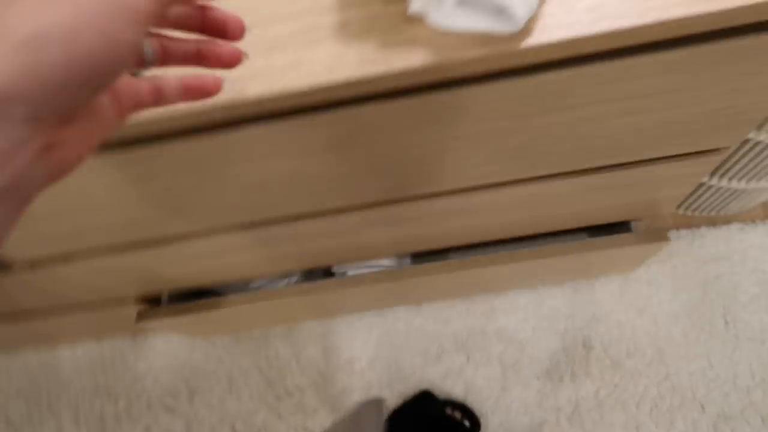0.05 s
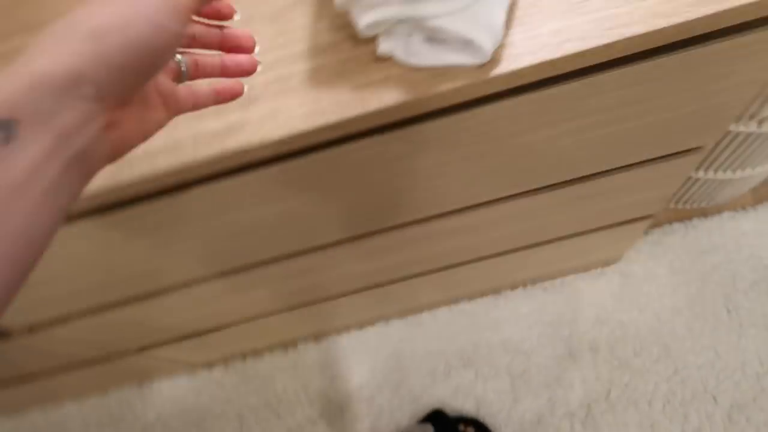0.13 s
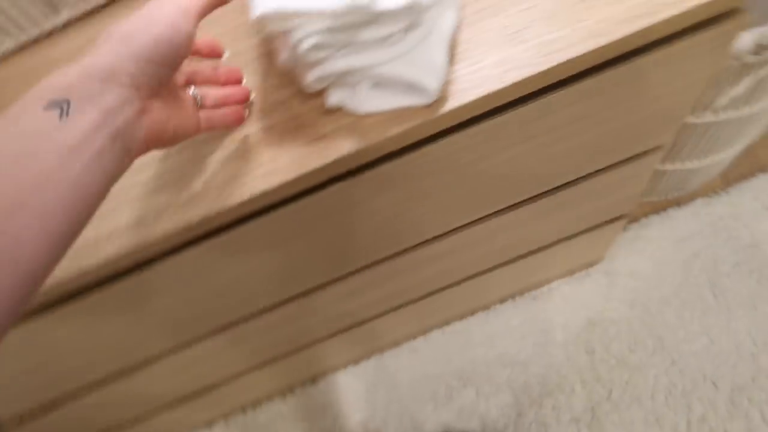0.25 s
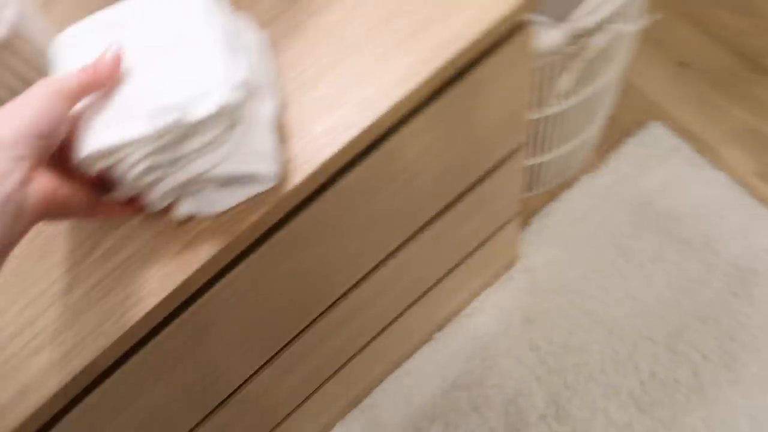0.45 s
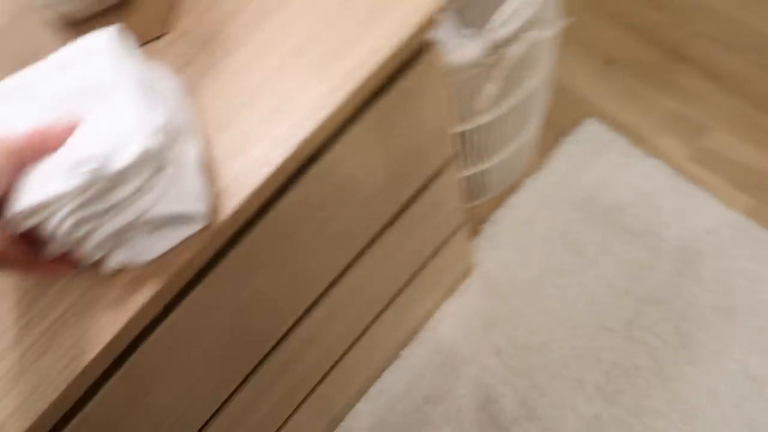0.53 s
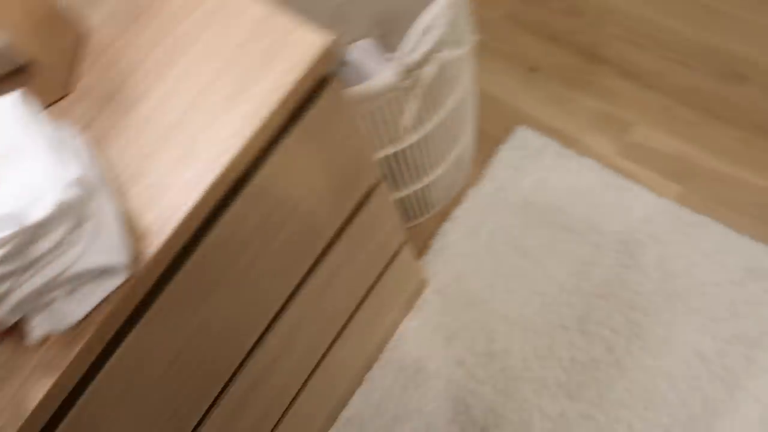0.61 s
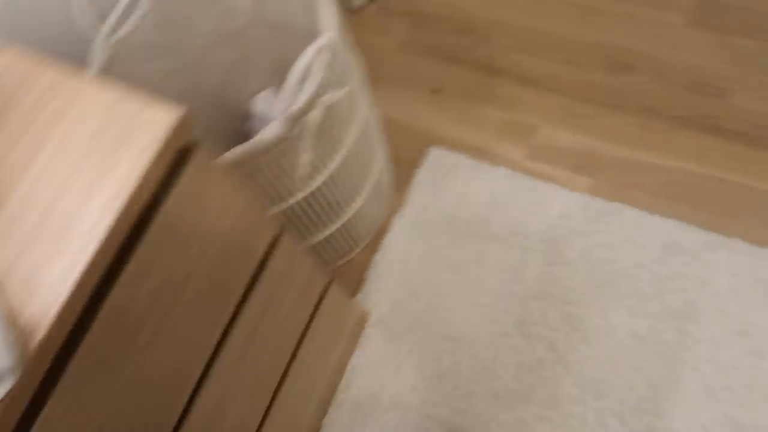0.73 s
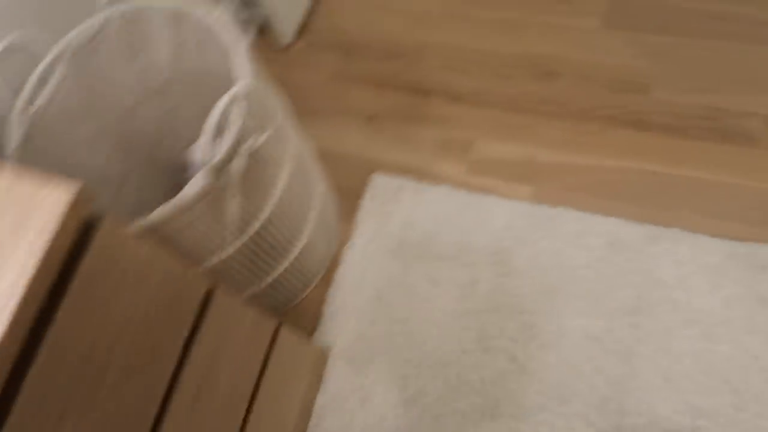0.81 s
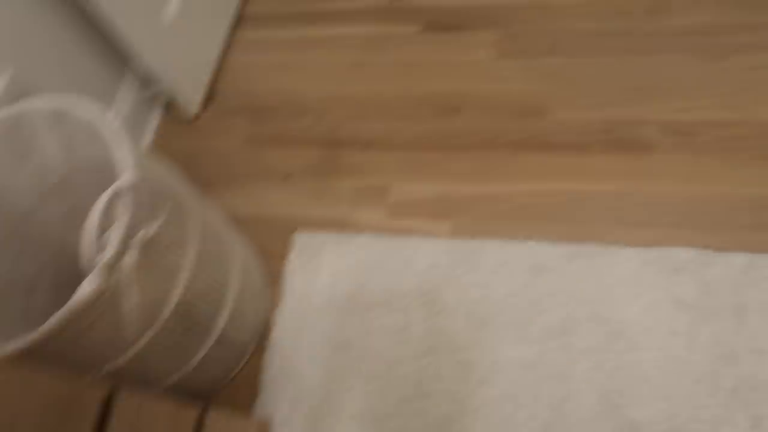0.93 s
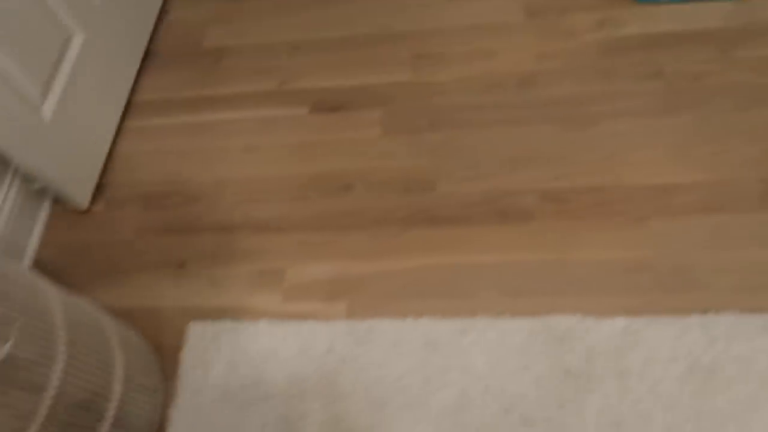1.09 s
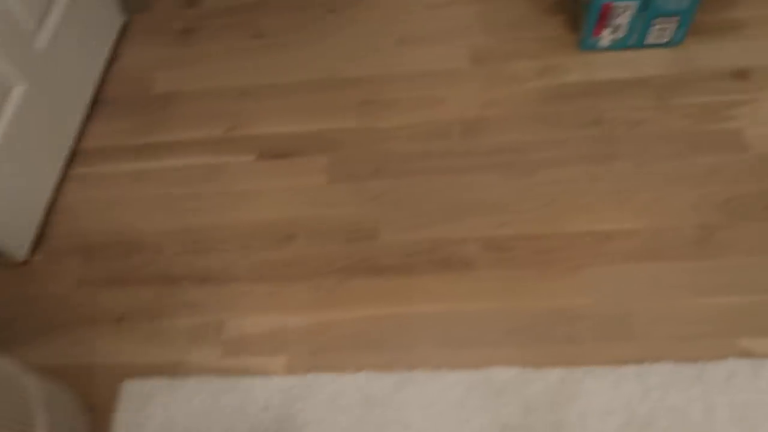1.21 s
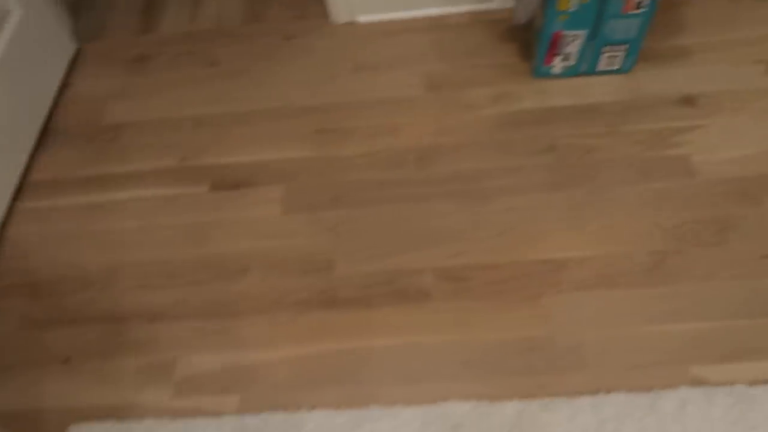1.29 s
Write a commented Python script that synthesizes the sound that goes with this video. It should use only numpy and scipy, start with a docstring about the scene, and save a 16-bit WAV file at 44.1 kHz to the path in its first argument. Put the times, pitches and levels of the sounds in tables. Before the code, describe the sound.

Wooden drawer slides briefly and bangs closed, rattling, followed by quiet steps on rug and floorboards.

```python
"""A wooden drawer rumbles along its runners with a rasping catch: shaped noise, cut off as it bumps shut.
The bumps are soft pulses into ringing panels, with cracks, end stop ringing and a rattle; the room answers.
Cloth rustles briefly (noise), then someone steps off: soft thuds on a rug (dying sines), heel knocks on
floorboards (modes plus noise) and a small tick (three modes), as microphone hiss (noise) rises late.
Quiet room air (noise) runs throughout."""
import sys
import numpy as np
from scipy import signal
from scipy.fft import rfft, irfft, next_fast_len
from scipy.io import wavfile
from scipy.ndimage import map_coordinates

SR = 44100
rng = np.random.default_rng(int(sys.argv[2]) if len(sys.argv) > 2 else 0)


def output_pcm(signal):
    """Save a mono or channel-first signal as 16-bit PCM at the path in sys.argv[1].

    Samples are clipped to [-1, 1] before scaling.
    """
    pcm = np.clip(np.atleast_2d(signal).T, -1, 1) * 32767
    wavfile.write(sys.argv[1], SR, np.round(pcm).astype(np.int16))


N = 59535


def amp(db):
    """Amplitude factor of a level in dB."""
    return 10 ** (np.asarray(db) / 20)


def unit(x):
    """x scaled to rms 1."""
    return x / np.sqrt(np.mean(x ** 2) + 1e-20)


def along(points, hz):
    """(Hz, value) points interpolated on a log frequency axis."""
    f, v = np.transpose(points)
    return np.interp(np.log(hz + 1), np.log(f + 1), v)


def curve(rows, axis):
    """One column of a time table, per sample."""
    rows = np.array(rows)
    return np.interp(np.arange(N) / SR, rows[:, 0], rows[:, axis])


def filtered(x, response):
    """x times a response of frequency."""
    m = next_fast_len(x.shape[-1] + 8192)
    spectrum = rfft(x, m) * response(np.fft.rfftfreq(m, 1 / SR))
    return irfft(spectrum, m)[..., :x.shape[-1]]


def noise(spectrum, size=N):
    """Coloured noise of rms 1."""
    white = rng.standard_normal(size)
    return unit(filtered(white, lambda hz: amp(along(spectrum, hz))))


def wobble(rate_hz):
    """Smooth random curve through rate_hz random points a second."""
    points = rng.standard_normal(int(N * rate_hz / SR) + 4)
    return map_coordinates(points, [np.arange(N) * rate_hz / SR])


def dying(spectrum, t60s):
    """One second of rms 1 noise whose bands then die at their own speeds."""
    hz, t, bands = signal.stft(noise(spectrum, size=SR), SR, nperseg=256)
    t60_s = np.maximum(along(t60s, hz), .01)[:, None]
    return signal.istft(bands * amp(-60 * t / t60_s), SR, nperseg=256)[1][:SR]


def ring(modes, scatter_db):
    """Sum of decaying modes; their phases wander at random, more as the ringing goes on."""
    wander_rad, wander_rate_hz, wander_s = 0.64, 19.8, 0.043
    t = np.arange(N) / SR
    wander = wander_rad * (1 - np.exp(-t / wander_s))
    total = np.zeros(N)
    for hz, db, t60_s in modes:
        level = amp(db + scatter_db * rng.normal() - 60 * t / t60_s)
        total += level * np.cos(2 * np.pi * hz * t + wander * wobble(wander_rate_hz))
    return total


def add(track, s, x):
    """Mix x into the track at s seconds."""
    part = track[round(s * SR):][:len(x)]
    part += x[:len(part)]


def stereo(mid, other, side):
    """Left and right from mid plus and minus a side signal, coloured from other."""
    s = filtered(other, lambda hz: amp(along(side, hz)))
    return np.array([mid + s, mid - s])


def background():
    """Room air and soft hiss: coloured noises with wandering levels, wide in the treble."""
    # Air and hiss spectra. Each row: frequency in Hz, relative density in dB per Hz.
    air_spectrum = [(12, -31), (20, 0.5), (124, -6.5), (187, -9.5), (458, -14.5), (570, -19), (709, -18.5),
                    (1070, -25), (2000, -31.5), (2620, -33.5), (13400, -53.5)]
    hiss_spectrum = [(300, -28), (700, -1), (1500, -5.5), (2340, -8), (3500, -9), (4590, -12), (13400, -29)]
    # Soft hiss level: a brief cloth rustle near 0.5 s, then microphone hiss rising late.
    # Each row: time in seconds, level in dB.
    hiss_levels = [(.3, -75), (.44, -69), (.51, -63), (.6, -89), (.85, -82), (1.0, -71), (1.1, -62.5),
                   (1.27, -63.5), (1.305, -57), (1.335, -60.5), (1.35, -63)]
    # Stereo width. Each row: frequency in Hz, side over mid in dB.
    air_side = [(60, -41), (110, -14.5), (200, -15), (360, -6), (650, -8.5), (1190, -3.5), (2160, -1),
                (3930, 0.5), (7140, 0.5), (13000, 0)]
    air_db = -51
    air_level = amp(air_db + 2.8 * wobble(6.57))
    air = air_level * stereo(noise(air_spectrum), noise(air_spectrum), air_side)
    hiss_level = amp(curve(hiss_levels, axis=1) + 1.2 * wobble(80))
    hiss = hiss_level * stereo(noise(hiss_spectrum), noise(hiss_spectrum), air_side)
    return air + hiss


def room(x):
    """Diffuse tail: x convolved with dying noise, partly different in each channel."""
    # Tail decay. Each row: frequency in Hz, t60 in seconds.
    room_t60 = [(100, 0.64), (500, 0.92), (1500, 1), (4000, 1), (12000, 0.24)]
    # Tail colour. Each row: frequency in Hz, relative level in dB.
    room_colour = [(60, -17), (300, -3.5), (1500, 0), (3000, -4), (6000, -6), (12000, -9.5)]
    # Tail width. Each row: frequency in Hz, side over mid in dB.
    room_side = [(60, -38), (300, -28), (1200, -29), (4000, -4), (13000, 3)]
    room_db = -25
    tails = [dying(room_colour, room_t60) for _ in range(2)]
    mid, other = [signal.fftconvolve(x, tail / np.linalg.norm(tail))[:N] for tail in tails]
    return amp(room_db) * stereo(mid, other, room_side)


def steps():
    """Heel knocks ring the boards, soft footfalls are low dying sines, a tick rings three modes."""
    # Heel on floorboards. Each row: start in seconds, level in dB, noise over modes in dB.
    knocks = [(.872, -32.5, -1.5), (.902, -46, 2.5), (.911, -43.5, -1), (.97, -52.5, -0.5),
              (1.167, -50.5, -4.5), (1.183, -53, -4)]
    # Board modes. Each row: frequency in Hz, relative level in dB, t60 in seconds.
    boards = [(217.4, -11, 0.16), (321, -7, .1), (424, -5, .1), (481.6, -5.5, 0.31), (556, -5.5, 0.15),
              (682, -0.5, 0.064), (800, -0.5, 0.061), (1422, -10, 0.11)]
    # Board noise spectrum. Each row: frequency in Hz, relative density in dB per Hz.
    board_noise = [(90, -19), (150, -8.5), (260, -7.5), (480, 4.5), (714, -8.5), (1410, -13), (3000, -23.5),
                   (5760, -36), (13400, -76)]
    # Board noise decay. Each row: frequency in Hz, t60 in seconds.
    board_t60 = [(200, 0.23), (1000, 0.25), (4000, 0.29), (12000, .15)]
    # Soft footfalls. Each row: start in seconds, level in dB, pitch in Hz, t60 in seconds.
    thuds = [(.724, -27.5, 116, 0.05), (.746, -33, 105.6, 0.082), (0.921, -38, 47.3, 0.19),
             (1.021, -38, 57.4, .3), (1.149, -35.5, 65.6, 0.19)]
    # Tick modes. Each row: frequency in Hz, relative level in dB, t60 in seconds.
    tick = [(1220, 0.5, 0.038), (1340, -10, 0.035), (230, 3, 0.076)]
    knock_rise_s, thud_rise_s = 0.00046, 0.0066
    tick_s, tick_db = 1.288, -46

    out, t = np.zeros(N), np.arange(SR) / SR
    onset = 1 - np.exp(-(t / knock_rise_s) ** 2)
    for s, db, noise_db in knocks:
        modes = ring(boards, scatter_db=4.5)[:SR]
        clatter = amp(noise_db) * dying(board_noise, board_t60)
        add(out, s, amp(db) * onset * (modes + clatter))
    for s, db, hz, t60_s in thuds:
        level = amp(db - 60 * t / t60_s) * (1 - np.exp(-t / thud_rise_s))
        add(out, s, -level * np.sin(2 * np.pi * hz * t))
    add(out, tick_s, amp(tick_db) * onset * ring(tick, scatter_db=2)[:SR])
    return out


def slide():
    """Uneven rumble of the box, scrape and resonant rasp of the runners, cut off by the bump."""
    # Drawer travel. Each row: time in seconds, rumble level in dB, scrape level in dB.
    travel = [(0, -29, -49), (.035, -32, -48.5), (.062, -31.5, -48.5), (.09, -32.5, -45.5), (.13, -34, -49),
              (.17, -32.5, -52), (.2, -37, -44.5)]
    # Rumble and scrape spectra. Each row: frequency in Hz, relative density in dB per Hz.
    rumble_spectrum = [(18, -47), (30, -31), (64, 2.5), (122, -1.5), (237, -6), (377, -15.5), (637, -21),
                       (816, -19), (1200, -30), (1560, -32.5), (2640, -120)]
    scrape_spectrum = [(350, -20), (600, -1), (1400, -2), (2500, -7), (4000, -13.5), (6000, -23.5),
                       (9000, -28.5), (13400, -40)]
    # Runner resonances. Each row: frequency in Hz, width in Hz, relative level in dB.
    runner = [(1493, 250, 2), (1747, 210, 3), (2607, 240, 4), (2940, 120, 3), (4310, 250, -5.5)]
    slide_stop_s = .201
    catch_s, catch_db, catch_rise_s, catch_t60_s = 0.0967, -38, .03, 0.33  # rise: over 60 dB

    def resonance(hz):
        """Sum of the runner's band-pass resonances."""
        return sum(amp(db) * 1j * hz * width / (centre ** 2 - hz ** 2 + 1j * hz * width)
                   for centre, width, db in runner)

    t = np.arange(N) / SR
    rumble = amp(curve(travel, axis=1) + 1.6 * wobble(41)) * noise(rumble_spectrum)
    scrape = amp(curve(travel, axis=2) + 0.9 * wobble(120)) * noise(scrape_spectrum)
    grit = amp(4.8 * wobble(249.6)) * rng.standard_normal(N)
    # the runner catches and rasps
    catch = catch_db - 60 * np.abs(t - catch_s) / np.where(t > catch_s, catch_t60_s, catch_rise_s)
    rasp = amp(catch) * unit(filtered(grit, lambda hz: resonance(hz) ** 2))
    return (rumble + scrape + rasp) * (t < slide_stop_s)


def bump():
    """Each contact pushes the panels with a soft pulse, cracks and rings the end stop; one rattle follows."""
    # Drawer front on the frame. Each row: start in seconds, push level in dB, contact length in seconds,
    # crack level in dB, stop ring level in dB.
    bumps = [(.2015, -10, 0.0022, -34, -57), (.205, -28, 0.0014, -14.5, -39),
             (0.2171, -34.5, .001, -25.5, -31.5), (.222, -34, 0.0016, -35, -27.5),
             (.229, -27.5, 0.0011, -30.5, -26)]
    # Dresser panel and runner end stop modes. Each row: frequency in Hz, relative level in dB, t60 in seconds.
    panels = [(95.6, -2, 0.51), (120, -4.5, 0.37), (162, 1.5, 0.096), (170, 0.5, 0.31), (204.3, 2.5, .4),
              (241.8, -5.5, 0.43), (293.2, -6.5, 0.34), (352.6, -5, 0.33), (406, -5.5, 0.32),
              (540, -7, 0.17), (560, -18, 0.22), (667, -15, .16), (795, 2, 0.22), (992, 6.5, 0.21)]
    stop = [(1650.5, 5.5, 0.064), (1873, 0.5, 0.054), (1986, 2.5, 0.057), (2530, -20, 0.065),
            (3072, -2, 0.038), (4200, -20, 0.027), (5000, -8.5, 0.026)]
    # Crack and rattle (dense small modes) spectra. Each row: frequency in Hz, relative density in dB per Hz.
    crack_spectrum = [(180, -35), (400, -5), (1500, -8.5), (3100, -4.5), (4500, -11), (6460, -23),
                      (13400, -42)]
    rattle_spectrum = [(40, -21), (100, -11.5), (200, -8), (400, -8), (724, -14.5), (1070, -20),
                       (1920, -23.5), (4000, -36.5), (8000, -47), (13400, -62)]
    # Rattle decay. Each row: frequency in Hz, t60 in seconds.
    rattle_t60 = [(50, 0.85), (200, 0.47), (1000, 0.38), (3000, 0.3), (12000, 0.31)]
    panel_rise_s, crack_rise_s, crack_t60_s = 0.002, 0.00061, 0.037
    rattle_db = -16

    out, t = np.zeros(N), np.arange(N) / SR
    panel_onset = 1 - np.exp(-t / panel_rise_s)  # the panels take up the blow gradually
    crack_onset = 1 - np.exp(-t / crack_rise_s)
    for s, push_db, length_s, crack_db, stop_db in bumps:
        push = np.sin(np.pi * np.clip(t[:SR // 20] / length_s, 0, 1)) ** 2
        body = panel_onset * ring(panels, scatter_db=2.7)
        add(out, s, amp(push_db) * signal.fftconvolve(body, push / push.sum()))
        add(out, s, amp(crack_db - 60 * t / crack_t60_s) * crack_onset * noise(crack_spectrum))
        add(out, s, amp(stop_db) * crack_onset * ring(stop, scatter_db=3.5))
    add(out, bumps[1][0], amp(rattle_db) * dying(rattle_spectrum, rattle_t60))  # from the second contact
    return out


def scene():
    """Near sounds, with a quarter-turned and scattered side signal, plus room tail and background."""
    # Near stereo width. Each row: frequency in Hz, side over mid in dB.
    near_side = [(60, -49), (200, -46), (360, -33), (650, -38), (1190, -26), (2160, -20), (3930, -14.5),
                 (7140, -6.5), (13000, 1.5)]
    smear_db = 0  # scattered part of the side signal
    near = slide() + bump() + steps()
    smear = rng.standard_normal(1500) * np.exp(-np.arange(1500) / 300)
    scattered = signal.fftconvolve(near, smear / np.linalg.norm(smear))[:N]
    quarter_turned = filtered(near, lambda hz: 1j + 0 * hz)
    twin = quarter_turned + amp(smear_db) * scattered
    return stereo(near, twin, near_side) + room(near) + background()


def record(dry):
    """The microphone rolls off the deep bass and rounds the peaks; nothing above the band limit."""
    mic_low_hz, top_hz, clip_top = 33, 13600, .92
    x = filtered(dry, lambda hz: (1j * hz / (mic_low_hz + 1j * hz)) ** 2)
    rounded = x / (1 + np.abs(x / clip_top) ** 6) ** (1 / 6)
    return filtered(rounded, lambda hz: hz < top_hz)


dry = scene()
out = record(dry)
output_pcm(out)
```